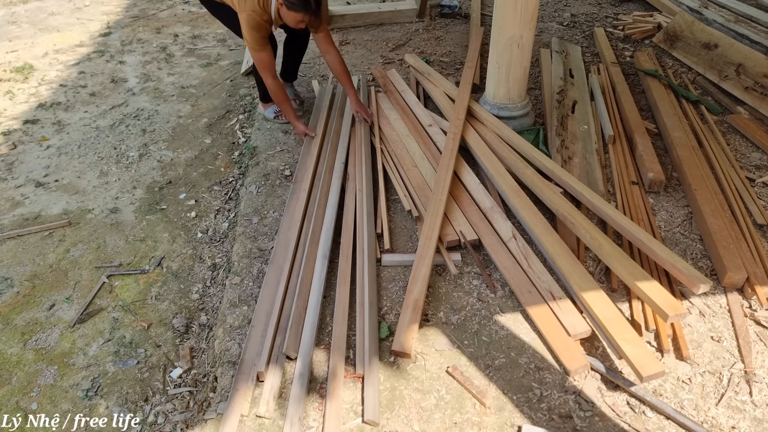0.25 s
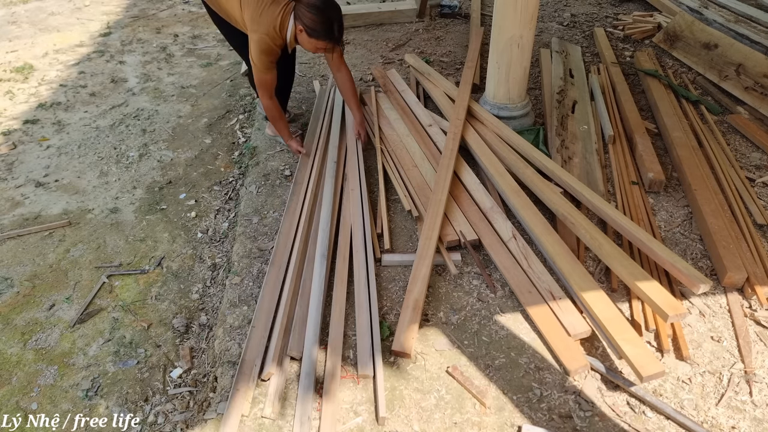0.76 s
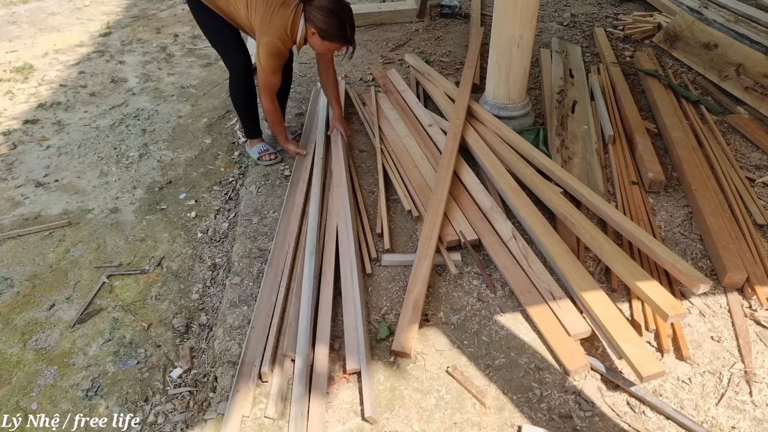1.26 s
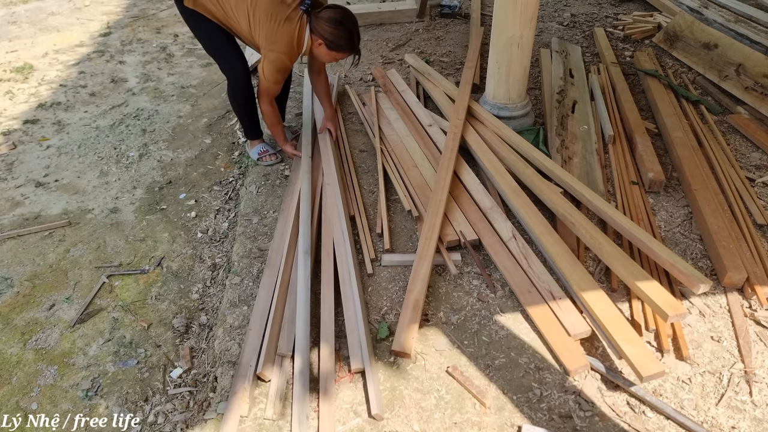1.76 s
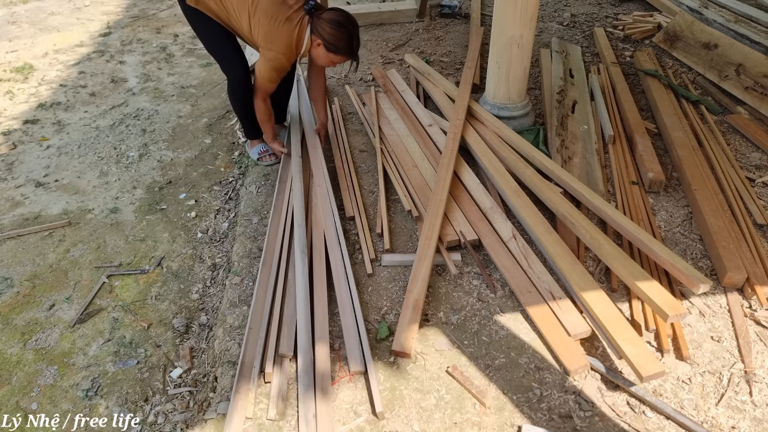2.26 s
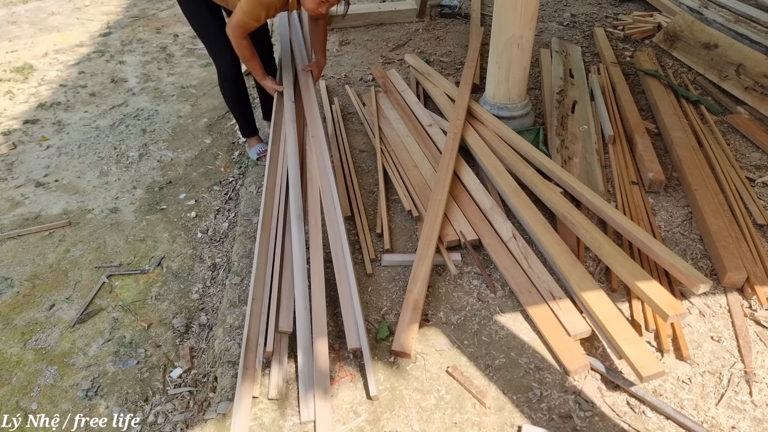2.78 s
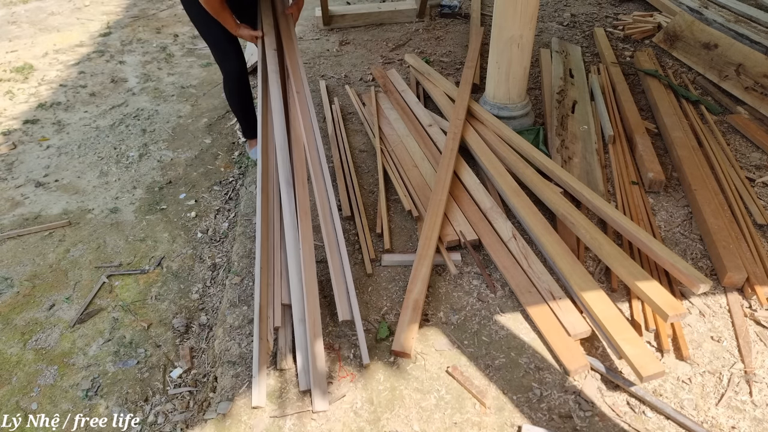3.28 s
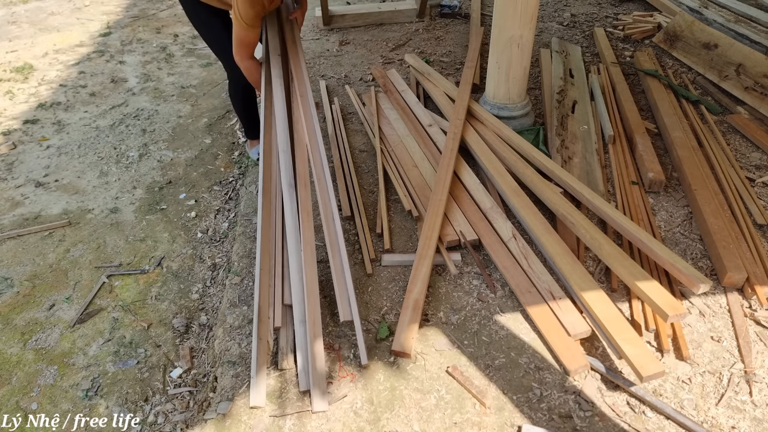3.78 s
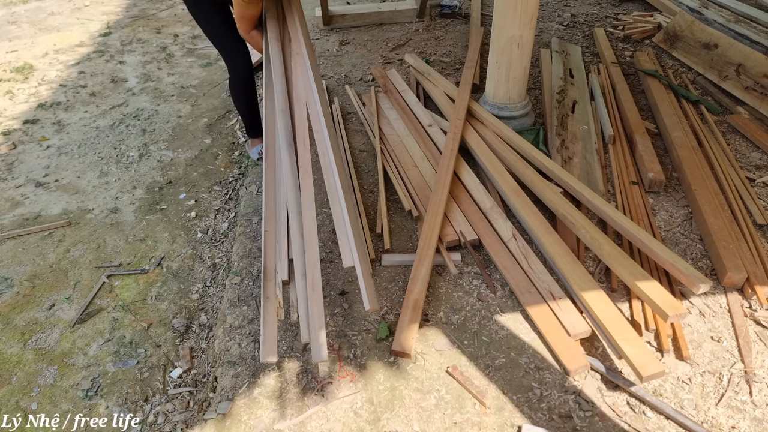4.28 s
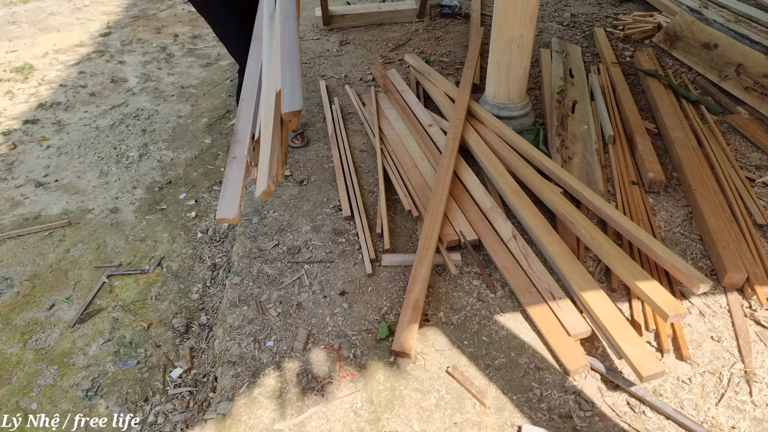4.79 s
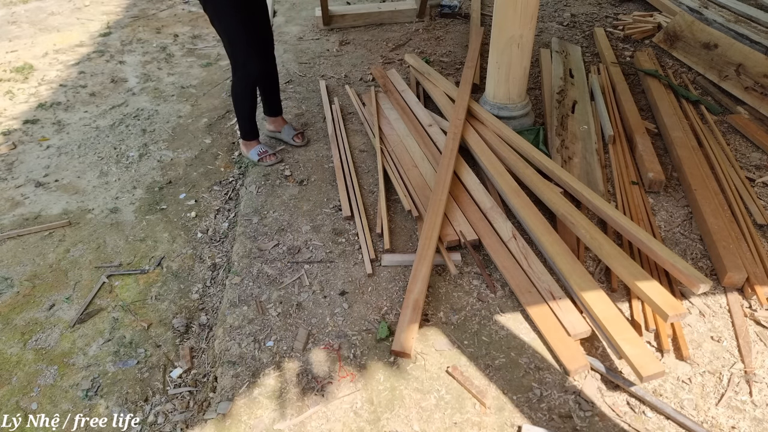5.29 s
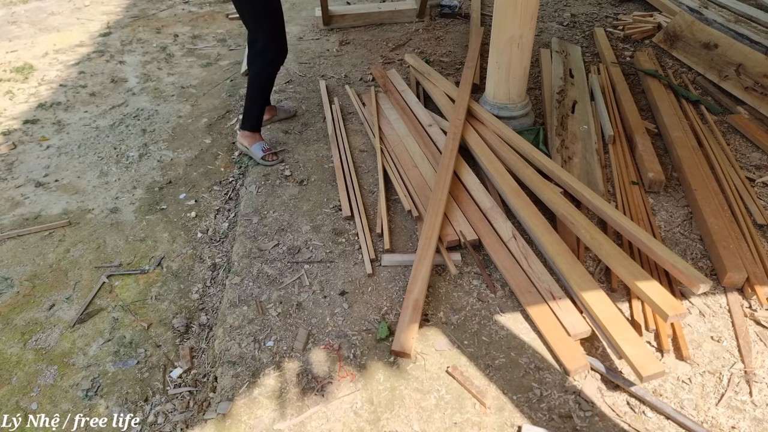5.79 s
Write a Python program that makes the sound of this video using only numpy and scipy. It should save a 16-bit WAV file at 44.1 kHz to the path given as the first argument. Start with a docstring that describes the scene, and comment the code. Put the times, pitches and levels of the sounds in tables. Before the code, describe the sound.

Dry wooden knocks and scraping from a bundle of timber strips, a dull shuddering lift, then three gritty footsteps in a quiet yard.

```python
"""Long wooden strips are gathered on bare ground: they knock, each blow ringing many bending modes, and rattle.
They slide with random stick-slip clicks that ring the same modes, while their ends drag through filtered grit noise.
The lifted bundle slaps shut and shudders as slow sines over a dull boom; three sandal steps scuff the ground.
Far off are soft air and insects, made of filtered noise, and a few faint bird whistles, made of gliding sines.
Scattered echoes and a faint tail place the work in a yard."""
import sys
import numpy as np
from scipy import signal
from scipy.fft import rfft, irfft
from scipy.io import wavfile
from scipy.ndimage import uniform_filter1d

SR = 44100
rng = np.random.default_rng(int(sys.argv[2]) if len(sys.argv) > 2 else 0)


def inscribe(sig):
    """Save sig as 16-bit PCM at rate SR to the path in sys.argv[1].

    A 1-D sig is mono; a 2-D sig holds one channel per row.
    Samples are clipped to [-1, 1] before scaling.
    """
    pcm = np.round(np.clip(np.atleast_2d(sig).T, -1, 1) * 32767)
    wavfile.write(sys.argv[1], SR, pcm.astype(np.int16))


N = 266805
TIME = np.arange(N) / SR


def from_db(db):
    """Turn decibels into gain."""
    return 10 ** (np.asarray(db) / 20)


def rms_one(x):
    """Scale to an average strength (rms) of 1."""
    return x / np.sqrt(np.mean(x ** 2) + 1e-20)


def band(x, hz, kind, order=2):
    """Keep one part of the pitch range (Butterworth filter)."""
    return signal.sosfilt(signal.butter(order, hz, kind, fs=SR, output="sos"), x)


def colour(x, spectrum):
    """Give a sound this spectrum with a filter that never acts ahead of time (minimum phase)."""
    hz, db = np.transpose(spectrum)
    size = 2 ** 12
    grid = np.maximum(np.arange(size // 2 + 1) * SR / size, 1)
    level_db = np.interp(np.log(grid), np.log(hz), db)
    # folding the cepstrum forwards in time gives the minimum phase
    cepstrum = irfft(np.log(from_db(level_db)))
    cepstrum[1:size // 2] *= 2
    cepstrum[size // 2 + 1:] = 0
    response = irfft(np.exp(rfft(cepstrum)))
    return signal.fftconvolve(x, response)[:len(x)]


def add(track, s, sound):
    """Mix a sound in at a time."""
    start = max(int(s * SR), 0)
    track[..., start:start + sound.shape[-1]] += sound[..., :N - start]


def panned(x, pan_db):
    """Mono to stereo by a level difference; positive is left."""
    return x * from_db([[pan_db / 2], [-pan_db / 2]])


def grains(per_s, spread_db):
    """Random clicks, many small and a few large."""
    sizes = from_db(spread_db * np.minimum(rng.exponential(1, N), 4))
    sizes = sizes * rng.choice([-1, 1], N)
    return sizes * (rng.random(N) < per_s / SR) + 1e-18


def ring(x, hz, t60):
    """Each click sets a dying sine ringing; t60 is the time to fall by 60 dB."""
    r, w = from_db(-60 / (t60 * SR)), 2 * np.pi * hz / SR
    return signal.lfilter([0, np.sin(w)], [1, -2 * r * np.cos(w), r * r], x)


def fade(t, t60):
    """Exponential decay, 60 dB down after t60 seconds."""
    return np.exp(-np.log(1000) * t / t60)


def wood_t60(hz, at_1k_s=0.074, slope=0.24):
    """Higher modes of the wood die sooner."""
    return at_1k_s * (hz / 1000) ** -slope


def wander(per_s, size=N):
    """Slow random drift with an rms of 1."""
    return rms_one(band(rng.standard_normal(size + SR), per_s, "low")[SR:])


def gesture(s, hold_s, rise_db_per_s, fall_db_per_s):
    """Gain over time: swells to 1 at s, holds, dies away."""
    early, late = np.maximum(s - TIME, 0), np.maximum(TIME - s - hold_s, 0)
    return from_db(-np.minimum(rise_db_per_s * early + fall_db_per_s * late, 200))


# colour of the distant air: (frequency [Hz], level per Hz [dB])
AIR_COLOUR = [(25, -12.5), (60, -4.5), (150, -12.5), (430, 3), (600, -4.5), (850, -1), (1700, -4.5),
              (4500, -9), (6500, -13.5), (9800, -15), (11000, -23.5)]
# narrow bands of insect song: (centre [Hz], width [Hz], level [dB])
INSECT_BANDS = [(4290, 45, -79), (5400, 830, -80.5), (7440, 600, -81.5), (7970, 220, -84)]
# bird whistles: (start [s], length [s], first pitch [Hz], last pitch [Hz], level before trim [dB])
BIRD_WHISTLES = [(0.158, 0.18, 7500, 7250, -63.5), (0.681, 0.14, 5320, 5250, -65.5),
                 (0.782, 0.49, 3120, 3030, -69), (1.595, .31, 3200, 3360, -57.5),
                 (3.08, 0.16, 6960, 7060, -70)]


def outdoors(air_db=-65.5, waver=0.0115, bird_trim_db=-0.5):
    """Far-off noise shaped into air and narrow insect bands, with sines gliding as bird whistles."""
    air = np.array([colour(noise, AIR_COLOUR) for noise in rng.standard_normal((2, N))])
    out = from_db(air_db) * rms_one(air)
    for hz, width_hz, db in INSECT_BANDS:
        song = band(rng.standard_normal((2, N)), [hz - width_hz / 2, hz + width_hz / 2], "band")
        out += from_db(db) * rms_one(song)
    for s, length, first_hz, last_hz, db in BIRD_WHISTLES:
        u = np.linspace(0, 1, int(length * SR))
        # one slow drift bends the pitch, two more vary the loudness on each side
        wobble, *scatter = rms_one(band(rng.standard_normal((3, SR)), 45, "low"))[:, -len(u):]
        pitch = (first_hz + (last_hz - first_hz) * u) * (1 + waver * wobble)
        swell = np.sqrt(np.abs(np.sin(np.pi * u))) * (1 + np.array(scatter) / 2)
        whistle = swell * np.sin(2 * np.pi * np.cumsum(pitch) / SR)
        add(out, s, from_db(db + bird_trim_db) * whistle)
    return out


def yard(x, echo_t60=0.049, echo_db=-3, tail_t60=0.2, tail_db=-17.5, wall_cut_hz=6000,
         bass_cut_hz=220, first_echo_s=0.0012, size=4096):
    """Ground and timber stacks scatter quick echoes, whose pattern changes as contacts move; a faint tail follows."""
    t, early = np.arange(SR * 2 // 3) / SR, np.zeros((2, N))
    window = np.sin(np.pi * np.arange(size) / size)
    # overlapping pieces of sound each get a fresh echo pattern
    for start in range(0, N, size // 2):
        piece = x[:, start:start + size] * window[:N - start]
        echoes = rng.standard_normal((2, size)) * (fade(t, echo_t60) * (t > first_echo_s))[:size]
        add(early, start / SR, signal.fftconvolve(piece, rms_one(echoes) / np.sqrt(size), axes=1))
    tail = rng.standard_normal((2, len(t))) * fade(t, tail_t60)
    tail = rms_one(band(tail, wall_cut_hz, "low", order=1))
    late = signal.fftconvolve(x, tail / np.sqrt(len(t)), axes=1)[:, :N]
    return band(from_db(echo_db) * early + from_db(tail_db) * late, bass_cut_hz, "high")


# colour of crushed sand: (frequency [Hz], level per Hz [dB])
GRIT_COLOUR = [(500, -25.5), (2000, 7.5), (3500, 6), (5500, 2.5), (7500, 1.5), (10000, -7), (15000, -6)]


def crunch(per_s=5000, spread_db=6.0, own_share=0.77):
    """Sand grains crushed in a dense, bright stream, partly shared by the two sides."""
    shared = grains(per_s, spread_db)
    sides = [colour(shared + own_share * grains(per_s, spread_db), GRIT_COLOUR) for _ in range(2)]
    return rms_one(np.array(sides))


# sandal steps: (touch-down [s], time to roll onto the sole [s], sole level [dB], sand level [dB],
# rasp level [dB], release [dB per s])
SANDAL_STEPS = [(5.428, 0.007, -59.5, -77, -64.5, 246.5), (5.656, 0.064, -40, -46.5, -53, 397),
                (5.979, 0.016, -55, -51, -50.5, 520)]
# colour of the scuffing sole: (frequency [Hz], level per Hz [dB])
SOLE_COLOUR = [(53, -64), (90, -30.5), (336, -7.5), (438, -17.5), (600, -8), (915, 1), (1750, -6.5),
               (2770, -16), (7800, -57.5)]
SOLE_SWELL_DB, SAND_FALL_DB = 13.5, 7.5   # over the time of one roll
SAND_RISE_DB_PER_S = 1002.5


def steps(rasp_hz=(1400, 3500)):
    """A sandal crushes sand at touch-down, then scuffs and its tread rasps as the weight rolls onto it."""
    sole, sand, tread = np.zeros((3, N))
    for s, roll_s, sole_db, sand_db, rasp_db, release_db_per_s in SANDAL_STEPS:
        weight = gesture(s + roll_s, 0, SOLE_SWELL_DB / roll_s, release_db_per_s)
        sole += from_db(sole_db) * weight
        tread += from_db(rasp_db) * weight
        sand += from_db(sand_db) * gesture(s, 0, SAND_RISE_DB_PER_S, SAND_FALL_DB / roll_s)
    scuff = rms_one(colour(grains(per_s=7000, spread_db=1.0), SOLE_COLOUR))
    rasp = rms_one(band(rng.standard_normal((2, N)), rasp_hz, "band", order=3))
    return sole * scuff + tread * rasp + sand * panned(crunch(), pan_db=-1.0)


# the lifted bundle flexes along its whole length: (frequency [Hz], level [dB], 60 dB decay time [s])
BUNDLE_FLEX = [(44.5, -47, 1.0), (53.3, -41.5, 0.92), (86, -40.5, 0.61), (96.4, -36, 0.21),
               (124.7, -39.5, 0.59), (165.3, -42.5, 0.5), (238, -30, 0.14), (747, -25.5, 0.11),
               (846, -21.5, 0.064)]
# dull boom of the swinging bundle: (frequency [Hz], level per Hz [dB])
BOOM_COLOUR = [(25, -17.5), (55, -10), (100, 10.5), (240, 1.5), (330, -5), (700, -40)]
LIFT_S = 4.557   # the bundle leaves the ground


def shudder(rise_cycles=1.6, loose_db=2.0, loose_per_s=12, boom_db=-54.5, boom_t60=0.48, boom_rise_s=0.0089):
    """The free ends slap together at the lift; the strips swing on unevenly, the slowest building up last."""
    t, out = np.arange(3 * SR // 2) / SR, np.zeros(N)
    swing = 0
    for hz, db, t60 in BUNDLE_FLEX:
        build_up = (1 - np.exp(-t * hz / rise_cycles)) ** 2
        looseness = from_db(db + loose_db * wander(loose_per_s, size=len(t)))
        sine = np.sin(2 * np.pi * (hz * t + rng.random()))
        swing = swing + build_up * fade(t, t60) * looseness * sine
    boom = rms_one(colour(rng.standard_normal(len(t)) * fade(t, boom_t60), BOOM_COLOUR))
    add(out, LIFT_S, swing + from_db(boom_db) * boom * (1 - np.exp(-t / boom_rise_s)))
    return panned(out, pan_db=-1.0)


# shoves that slide wood on wood and drag the ends through grit; sliding_effort plays them too:
# (full force [s], hold [s], wood level [dB], grit level [dB])
WORK_SHOVES = [(0.321, 0.098, -32, -52.5), (0.527, 0.0054, -40, -57.5), (1.013, 0.031, -39.5, -62),
               (1.08, 0.21, -33, -56), (1.4, 0.077, -33, -55), (1.684, 0.0091, -49, -78),
               (1.762, 0.038, -44.5, -68), (1.973, 0.02, -43.5, -62.5), (2.045, 0.057, -35.5, -60.5),
               (2.248, 0.1, -38.5, -60.5), (2.413, .02, -44.5, -78), (2.644, 0.13, -53.5, -69),
               (2.84, 0.15, -48.5, -54.5), (2.94, 0.075, -41, -47.5), (3.076, 0.021, -42.5, -56.5),
               (3.198, 0.039, -49, -60), (3.295, 0.014, -53.5, -68), (3.766, 0.026, -55.5, -68.5),
               (3.87, 0.088, -42.5, -63), (3.956, 0.006, -34, -52), (4.516, 0.02, -50.5, -72),
               (4.561, 0.046, -39, -54.5)]
# single grains cracking: (time [s], level [dB])
GRAIN_SNAPS = [(0.0625, -43.5), (0.073, -45), (1.2161, -30.5), (1.4103, -30), (2.8973, -41.5),
               (3.0628, -34), (5.654, -30.5), (5.6566, -41)]
GRIT_RISE_DB_PER_S, GRIT_FALL_DB_PER_S = 217.5, 182


def grit(snap_t60=0.027):
    """Strip ends plough through sand at each shove, and now and then a larger grain cracks."""
    drags = [from_db(grit_db) * gesture(s, hold_s, GRIT_RISE_DB_PER_S, GRIT_FALL_DB_PER_S)
             for s, hold_s, _, grit_db in WORK_SHOVES]
    out = np.max(drags, axis=0) * crunch()
    t = np.arange(SR // 10) / SR
    for s, level_db in GRAIN_SNAPS:
        burst = colour(rng.standard_normal(len(t)) * fade(t, snap_t60), GRIT_COLOUR)
        add(out, s, from_db(level_db) * burst)
    return panned(out, pan_db=-1.0)


# light rubbing as the strips shift in the hands: (time [s], level before lift [dB])
HAND_RUBBING = [(0, -62.5), (0.19, -63.5), (0.48, -55), (0.72, -61), (0.772, -53), (0.88, -75), (0.96, -62),
                (1.3, -35.5), (1.63, -57), (1.848, -54), (2.18, -65.5), (2.35, -53.5), (2.57, -59.5),
                (3.0, -47), (3.55, -92.5), (4.45, -74.5), (4.701, -55.5), (5.0, -85.5)]
SHOVE_RISE_DB_PER_S, SHOVE_FALL_DB_PER_S = 400.5, 307.5


def sliding_effort(handling_lift_db=1):
    """How hard the strips rub: at each moment the stronger of light handling and the shoves."""
    s, db = np.transpose(HAND_RUBBING)
    handling = from_db(handling_lift_db + np.interp(TIME, s, db))
    handling = handling * gesture(s[0], s[-1] - s[0], SHOVE_RISE_DB_PER_S, SHOVE_FALL_DB_PER_S)
    shoves = [from_db(wood_db) * gesture(s, hold_s, SHOVE_RISE_DB_PER_S, SHOVE_FALL_DB_PER_S)
              for s, hold_s, wood_db, _ in WORK_SHOVES]
    return np.max([handling, *shoves], axis=0)


# bending modes of the strips, for sliding and knocks: (frequency [Hz], level [dB])
BENDING_MODES = [(340, -21.5), (440, -19.5), (533, -8.5), (690, -15), (775, -9.5), (835, -10), (920, -4.5),
                 (991, -1.5), (1035, -5.5), (1112, -2.5), (1195, 1), (1286, -1.5), (1348, 0.5),
                 (1455, -4.5), (1561, -1.5), (1690, -8.5), (1770, -4.5), (1870, -9), (2035, -6),
                 (2200, -15), (2320, -13), (2557, -7.5), (2690, -15), (2838, -7), (3037, -7.5), (3435, -17),
                 (3900, -18.5)]
# crowd of heavily damped modes in the pile, for sliding and knocks: (frequency [Hz], level per Hz [dB])
PILE_COLOUR = [(40, -46.5), (110, -36), (260, -20.5), (380, -11), (700, -4), (1350, -1), (2000, -3.5),
               (3000, -8), (4000, -15.5), (5300, -23.5), (9000, -45.5), (15000, -60)]


def sliding(slips_per_s=1600, rate_growth=.5, spread_db=2.0, level_db=-1.5, patchy_db=3.5, patches_per_s=32,
            ends_db=-5, ends_hz=(380, 1000), hollow_hz=778, hollow_db=-4, raised_s=2.46, lowest_hz=160,
            rumble_db=-19, rumble_hz=(110, 240)):
    """Rough faces stick and slip; as the contact point travels, one mode after another speaks up."""
    effort = sliding_effort()
    # a light touch gives separate ticks, a firm shove a dense rub
    rate = slips_per_s * (effort / effort.max()) ** rate_growth + 60
    slips = band(grains(rate, spread_db), lowest_hz, "high")
    modes = np.zeros(N)
    for hz, db in BENDING_MODES:
        patches = from_db(db + patchy_db * wander(patches_per_s))
        modes += ring(slips * rng.standard_normal(N) * patches, hz, wood_t60(hz))
    rub = rms_one(band(modes, lowest_hz, "high")) + rms_one(colour(slips, PILE_COLOUR))
    rub = rub / np.sqrt(uniform_filter1d(rub ** 2, size=1500) + 1e-4)   # the hands keep a steady pressure
    # once the bundle is raised, its far ends scrape the ground with a lower, hollow sound
    ends = rms_one(band(grains(per_s=560, spread_db=2.5), ends_hz, "band"))
    ends = ends + from_db(hollow_db) * rms_one(ring(ends, hollow_hz, wood_t60(hollow_hz)))
    # and shake the whole length
    rumble = rms_one(band(rng.standard_normal(N), rumble_hz, "band"))
    ends = ends + from_db(rumble_db) * rumble
    ends = from_db(ends_db) * ends * np.clip((TIME - raised_s) / 0.64, 0, 1)
    return from_db(level_db) * effort * (panned(rub, pan_db=0.0) + panned(ends, pan_db=-0.5))


def knock(treble_db, bass_db, ring_hz, spread_db=2.0, favour_db=3.0, favour_width=0.13, aside_share=0.4,
          crack_db=-1.0, crack_t60=0.065, snap_t60=0.0054, close_s=0.0016, softening=0.45, hardness_db=-1.0,
          edge_db=-16.0, edge_hz=(3100, 4100), heft_db=-2.0, lowest_hz=320, detune=0.0059):
    """One blow: the contact point picks the modes, the hardness of the contact sets the colour."""
    t = np.arange(SR // 4) / SR
    hz, db = np.transpose(BENDING_MODES)[:, :, None]
    size, tune, sign = rng.standard_normal((3, len(hz), 1))
    # the strips rest on each other a little differently each time
    hz = hz * (1 + detune * tune)
    strength = from_db(db + spread_db * size) * np.sign(sign)
    modes = strength * np.sin(2 * np.pi * hz * t) * fade(t, wood_t60(hz))
    # each mode radiates a little differently to the left and right
    modes = (1 + aside_share * rng.standard_normal((2, len(hz)))) @ modes
    crack_fade = fade(t, crack_t60) + 5.3 * fade(t, snap_t60)
    crack = colour(rng.standard_normal(len(t)) * crack_fade, PILE_COLOUR)
    # broad, bass-rich contacts close more slowly than sharp edges
    closing = 1 - np.exp(-t / (close_s * from_db(softening * bass_db)))
    blow = (rms_one(modes) + from_db(crack_db) * rms_one(crack)) * closing
    # the strip that is hit rings louder than its neighbours
    favoured_hz = [ring_hz / (1 + favour_width), ring_hz * (1 + favour_width)]
    blow = blow + from_db(favour_db) * band(blow, favoured_hz, "band", order=1)
    bass = band(band(blow, lowest_hz, "high"), 700, "low", order=3)
    body = band(blow, [700, 2200], "band", order=3)
    treble = band(blow, 2200, "high", order=3)
    # hard edges bite higher
    edge = rms_one(band(treble, edge_hz, "band"))
    treble = rms_one(treble) + from_db(edge_db + treble_db / 2) * edge
    bass = panned(from_db(bass_db + heft_db) * rms_one(bass), pan_db=-3.5)
    treble = panned(from_db(treble_db + hardness_db) * rms_one(treble), pan_db=-0.7)
    return 0.068 * (bass + panned(rms_one(body), pan_db=0.5) + treble)


# strip knocks on strip, treble and bass set against the middle before knock() trims them:
# (time [s], level [dB], treble [dB], bass [dB], strongest ring [Hz], rebounds [count])
STRIP_KNOCKS = [(0.006, -36, -12.5, -7, 1260, 0), (0.059, -35.5, 7.5, -32, 1950, 0),
                (0.104, -29.5, -17, -5.5, 1110, 0), (0.152, -35, -28, -7, 1200, 0),
                (0.314, -24.5, -22, -23, 1500, 0), (0.331, -16.5, -26, -30, 1430, 1),
                (0.372, -5, -4, -25.5, 1560, 1), (0.394, -11.5, -9, -24, 1560, 0),
                (0.408, -11, -11.5, -21, 1200, 0), (0.416, -17, -1.5, -14, 1560, 0),
                (0.423, -21.5, -18, -12, 1020, 1), (0.526, -17.5, -13.5, -12.5, 1430, 0),
                (0.619, -30.5, -6, -28, 1660, 0), (0.793, -32, -15, -12, 1290, 0),
                (0.979, -22.5, -2.5, -10, 2380, 0), (0.998, -14.5, -4.5, -18, 1410, 0),
                (1.077, -16.5, -9, -11, 980, 0), (1.099, -8, -16, -23, 1335, 0),
                (1.132, -8.5, -3, -17.5, 1195, 1), (1.213, -13.5, -17, -21, 1230, 0),
                (1.229, -9, -14, -15, 1560, 1), (1.252, -18, -15, -9.5, 1335, 1),
                (1.288, -20, -30, -15, 1350, 0), (1.375, -14, -14, -10, 1160, 0),
                (1.398, -4, -7, -18.5, 1350, 0), (1.438, -14.5, -20, -11, 1260, 0),
                (1.452, -11, -8, -16, 1110, 1), (1.484, -14, -34, -2.5, 1250, 0),
                (1.505, -16.5, -18, -11, 1200, 0), (1.561, -23.5, -29, -15, 1800, 0),
                (1.711, -28, -13, -17, 1260, 0), (1.861, -29, -35, -17, 1170, 0),
                (1.971, -17.5, -33, -7.5, 1630, 0), (2.05, -11.5, -5.5, -21, 1296, 0),
                (2.058, -11, -5.5, -23, 1340, 0), (2.094, -15.5, -15.5, -4.5, 1230, 0),
                (2.24, -21, -9, -23, 1360, 0), (2.308, -9, -3, -21.5, 1870, 0),
                (2.326, -18, -16, -15, 1020, 1), (2.365, -28, -18, -5, 850, 0),
                (2.447, -45.5, 10, -21, 3250, 0), (2.496, -31.5, -30, -5, 1000, 0),
                (2.857, -33.5, -0.5, -7, 1980, 0), (2.96, -39, 6, -4, 780, 0),
                (3.015, -29.5, -0.5, -26, 2100, 0), (3.103, -27.5, -25, -18, 780, 0),
                (3.175, -27.5, -21, -7.5, 1690, 0), (3.221, -29.5, -12, -3, 1310, 0),
                (3.405, -31.5, -27.5, -2, 1720, 0), (3.859, -23, -30, -3.5, 1230, 0),
                (3.875, -26, -13, -1.5, 1550, 0), (3.891, -27, -3, -8, 770, 0),
                (3.949, -20.5, -19, -6, 1180, 0), (3.97, -13.5, -16, -4.5, 1150, 0),
                (4.405, -44, -13.5, -2.5, 1210, 0), (4.555, -14, 0, -11, 1650, 1),
                (4.679, -33, -24, -2, 1100, 0), (4.714, -51.5, 7, -10, 3650, 0),
                (4.773, -42.5, -19, -14, 1170, 0)]
# each rebound comes about a gap later and is weaker, duller and fuller than the blow before
REBOUND_GAP_S, REBOUND_LOSS_DB, REBOUND_DULLS_DB, REBOUND_FILLS_DB = 0.012, 1.5, 4.5, 2


def knocks():
    """Every blow of strip on strip, some with quick rebounds that lose strength and treble."""
    out = np.zeros((2, N))
    for s, level_db, treble_db, bass_db, ring_hz, count in STRIP_KNOCKS:
        for k in range(round(count) + 1):
            blow = knock(treble_db - k * REBOUND_DULLS_DB, bass_db + k * REBOUND_FILLS_DB, ring_hz)
            add(out, s, from_db(level_db - k * REBOUND_LOSS_DB) * blow)
            s += REBOUND_GAP_S * rng.uniform(.85, 1.15)
    return out


def scene():
    """The work goes on a little left of centre, so it reaches the right side four samples later."""
    left, right = steps() + shudder() + grit() + sliding() + knocks()
    near = np.array([left, np.pad(right, (4, 0))[:N]])
    return outdoors() + yard(near) + near


def record(dry, cutoff_hz=15800):
    """The top of the pitch range is cut steeply."""
    return signal.sosfilt(signal.ellip(10, .2, 80, cutoff_hz, fs=SR, output="sos"), dry)


dry = scene()
out = record(dry)
inscribe(out)
```